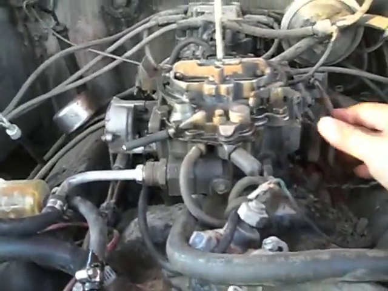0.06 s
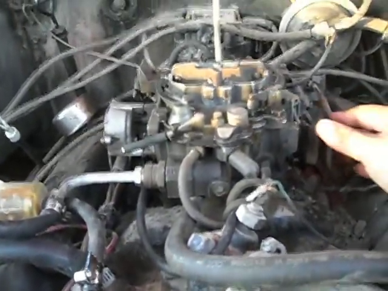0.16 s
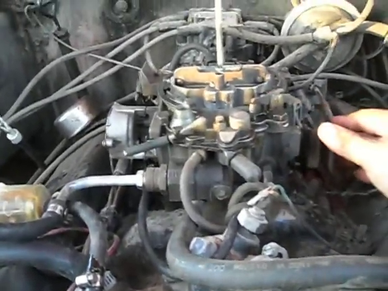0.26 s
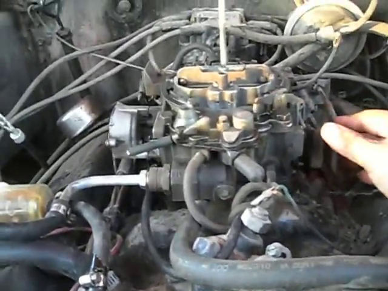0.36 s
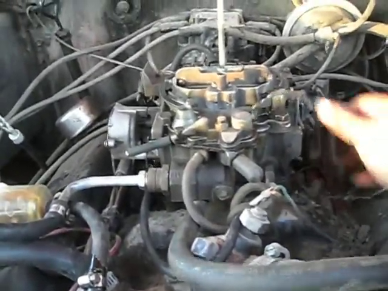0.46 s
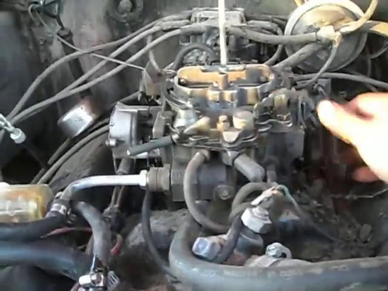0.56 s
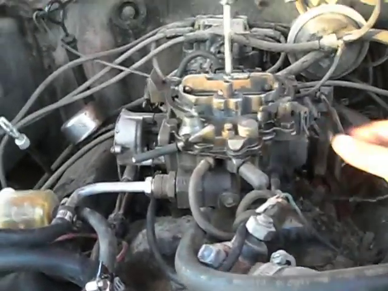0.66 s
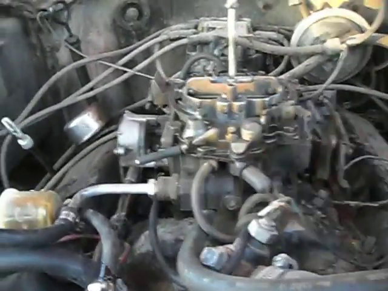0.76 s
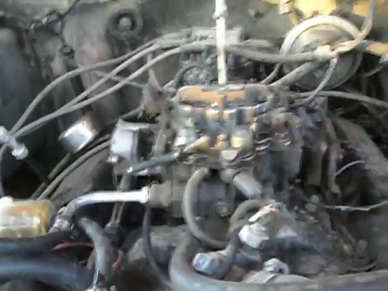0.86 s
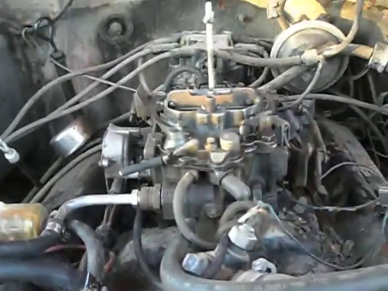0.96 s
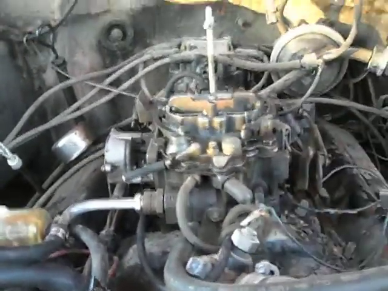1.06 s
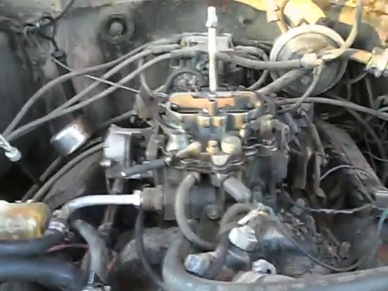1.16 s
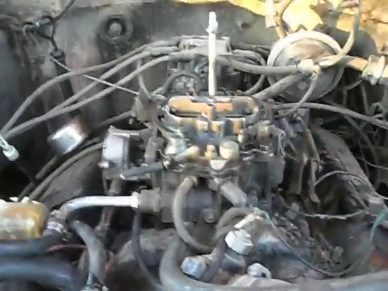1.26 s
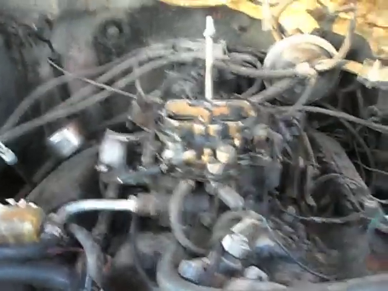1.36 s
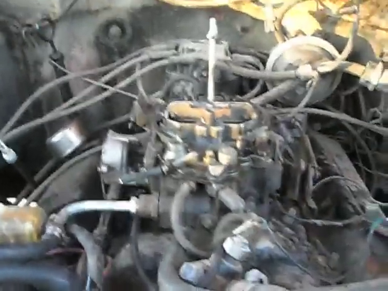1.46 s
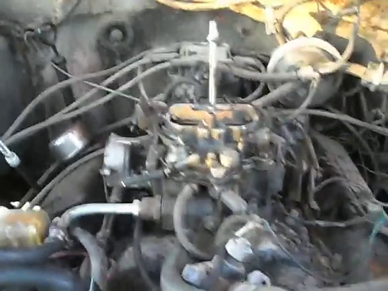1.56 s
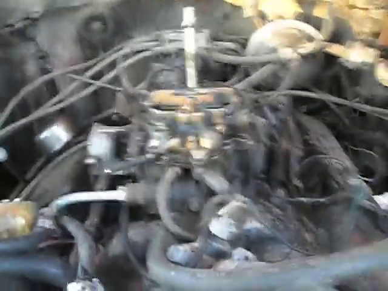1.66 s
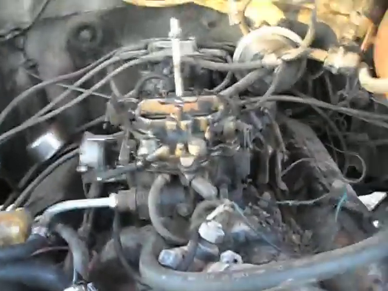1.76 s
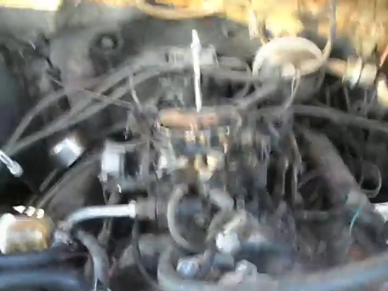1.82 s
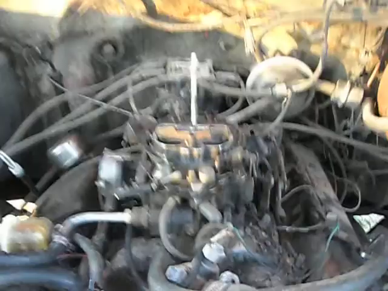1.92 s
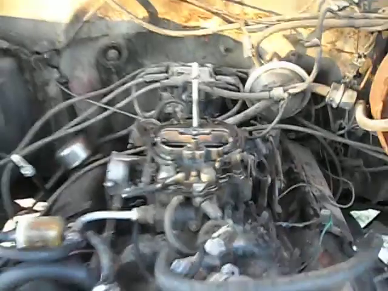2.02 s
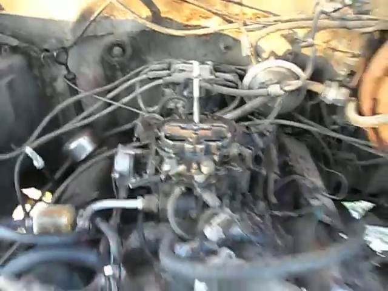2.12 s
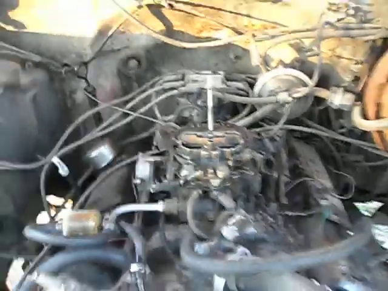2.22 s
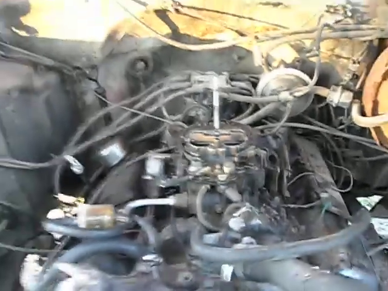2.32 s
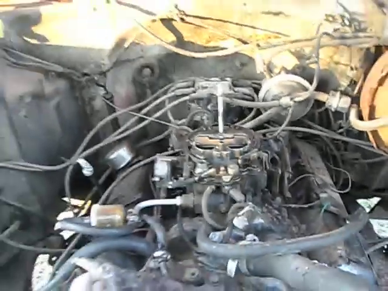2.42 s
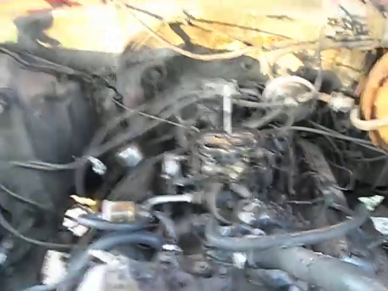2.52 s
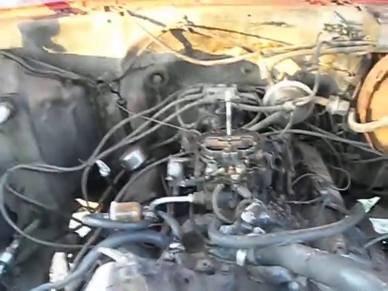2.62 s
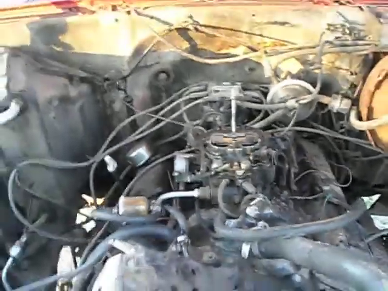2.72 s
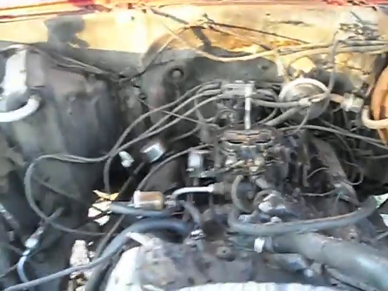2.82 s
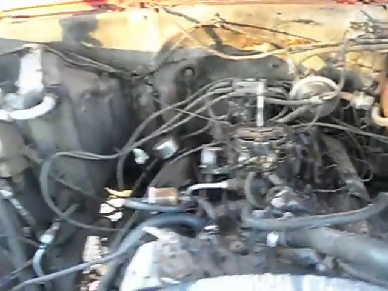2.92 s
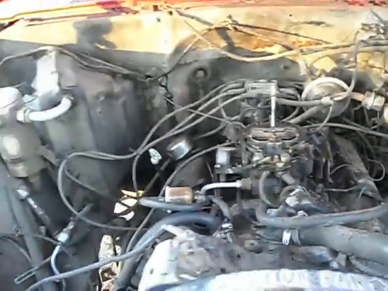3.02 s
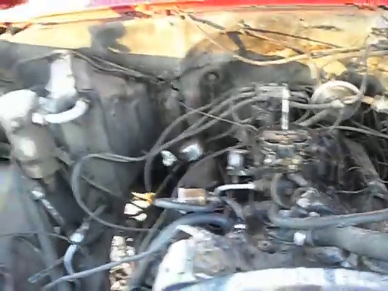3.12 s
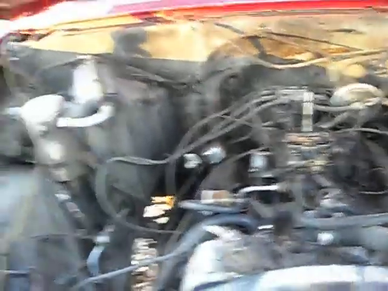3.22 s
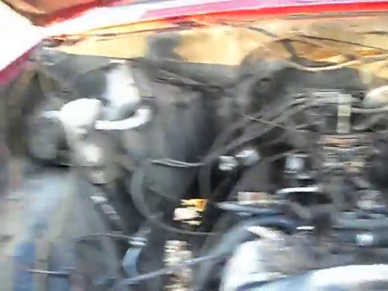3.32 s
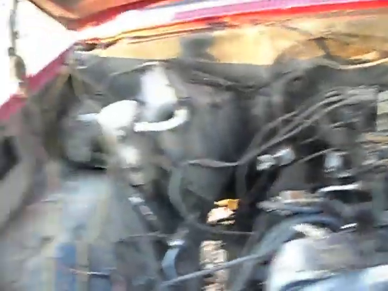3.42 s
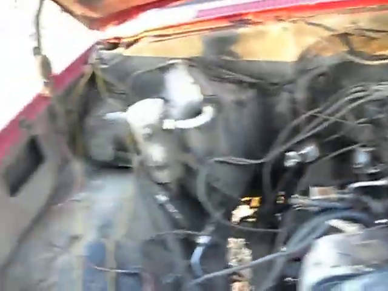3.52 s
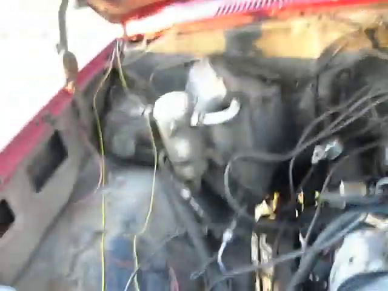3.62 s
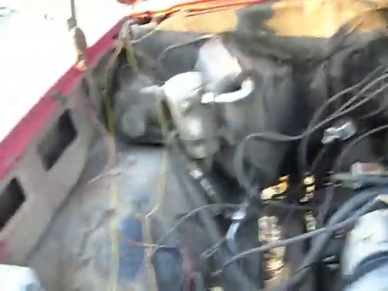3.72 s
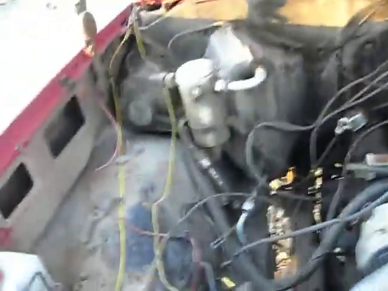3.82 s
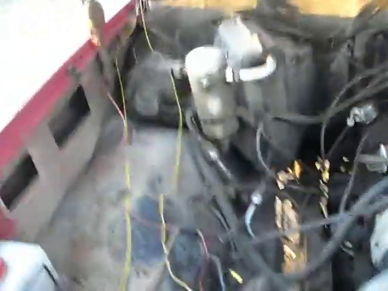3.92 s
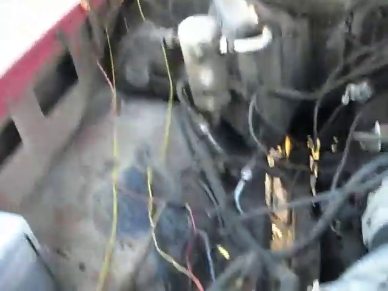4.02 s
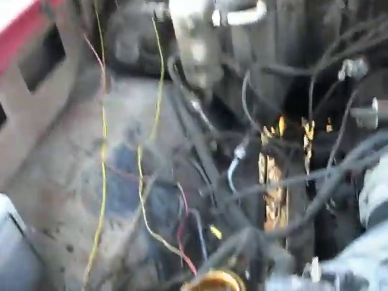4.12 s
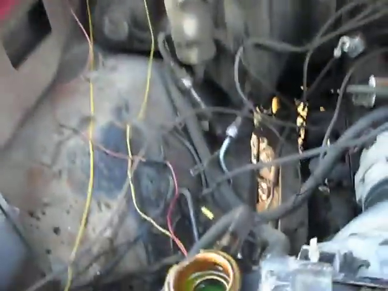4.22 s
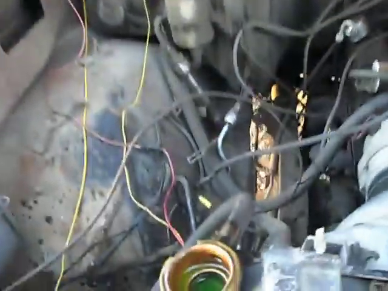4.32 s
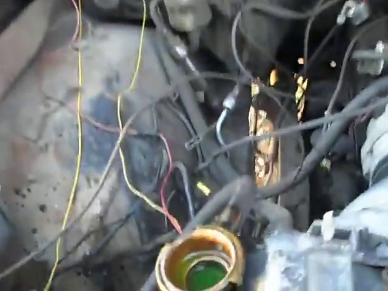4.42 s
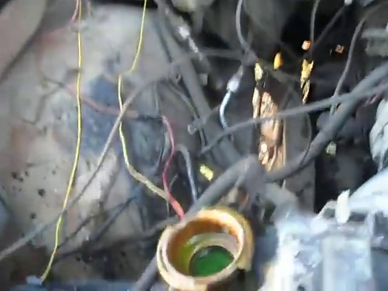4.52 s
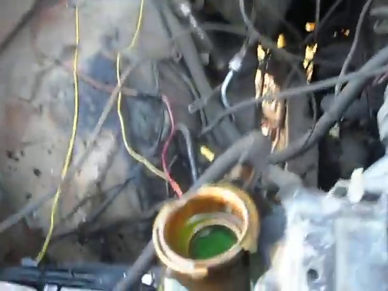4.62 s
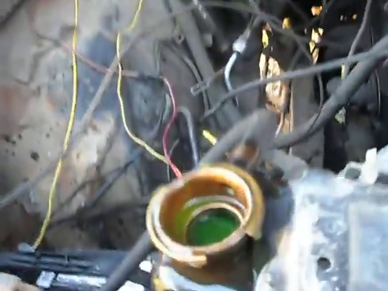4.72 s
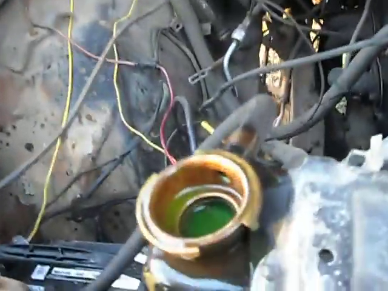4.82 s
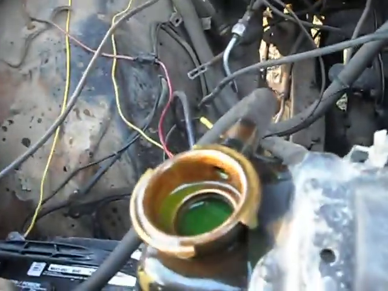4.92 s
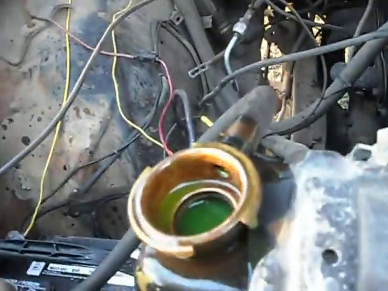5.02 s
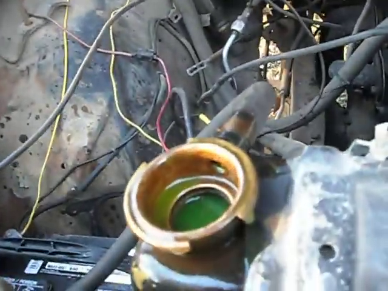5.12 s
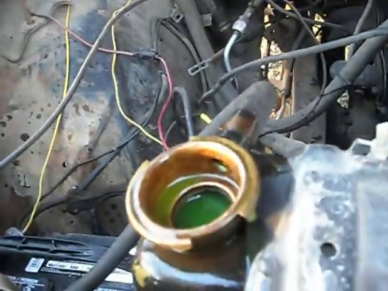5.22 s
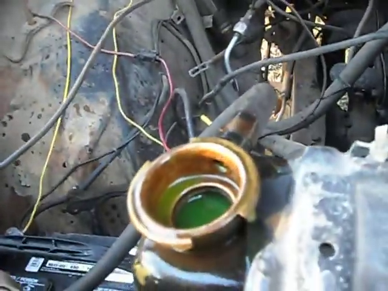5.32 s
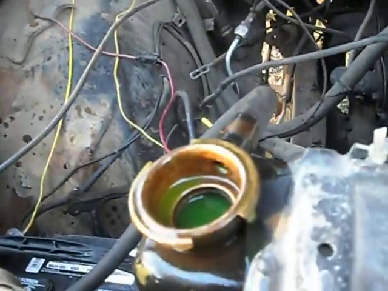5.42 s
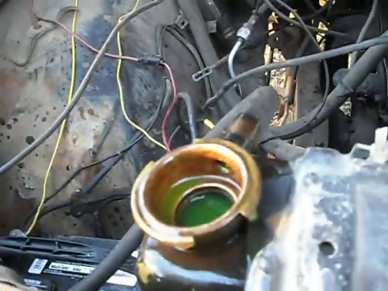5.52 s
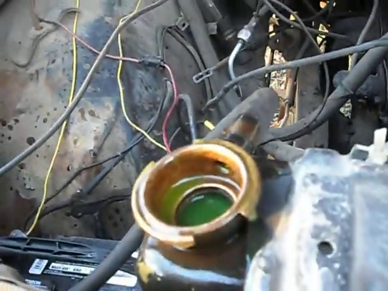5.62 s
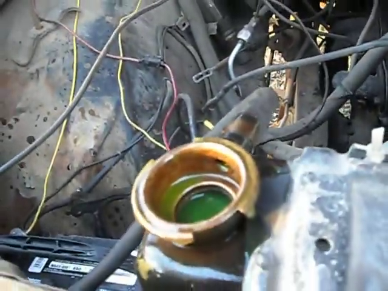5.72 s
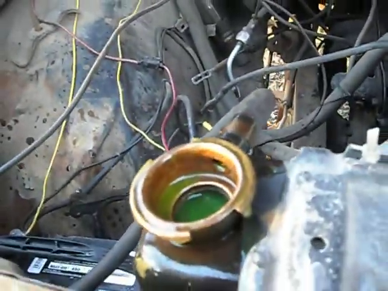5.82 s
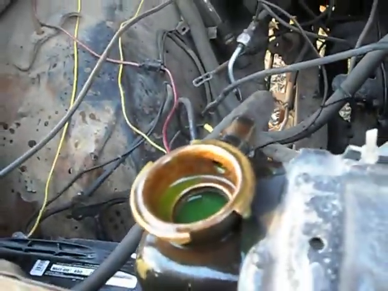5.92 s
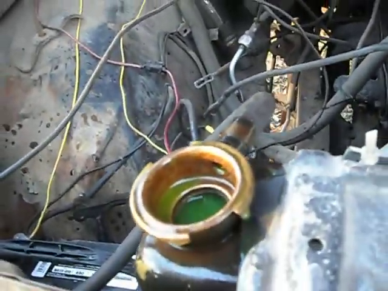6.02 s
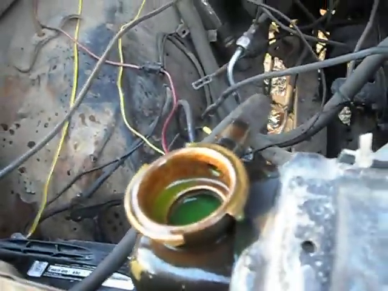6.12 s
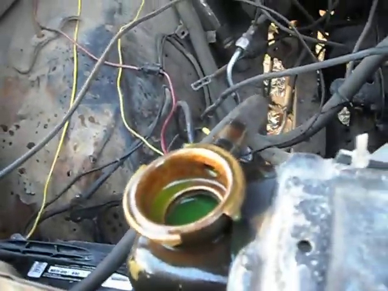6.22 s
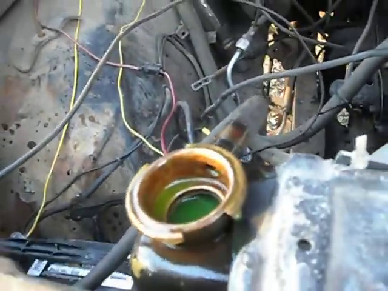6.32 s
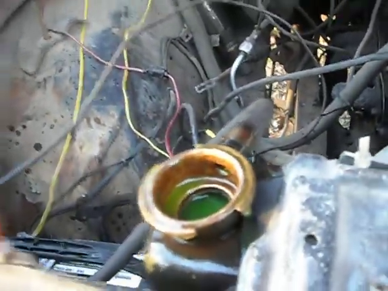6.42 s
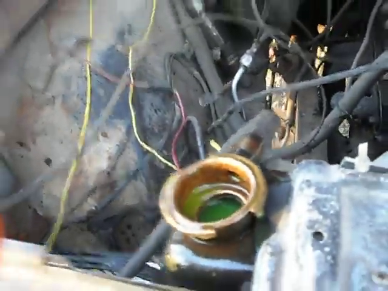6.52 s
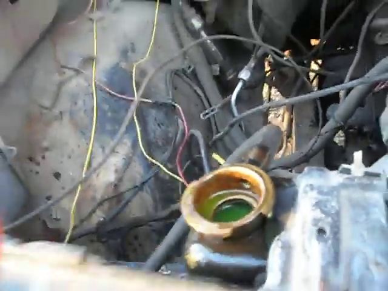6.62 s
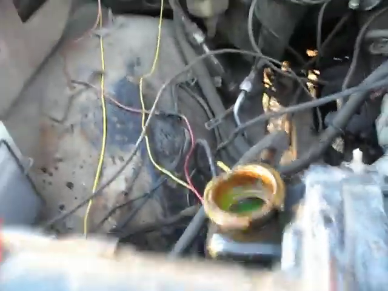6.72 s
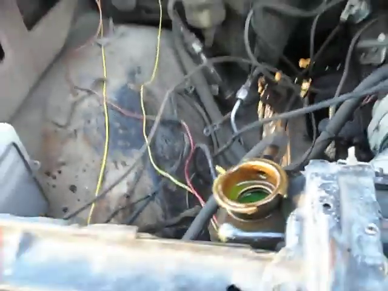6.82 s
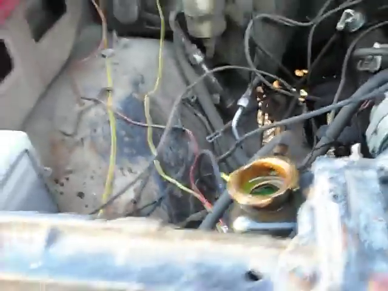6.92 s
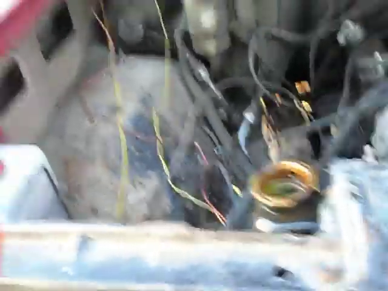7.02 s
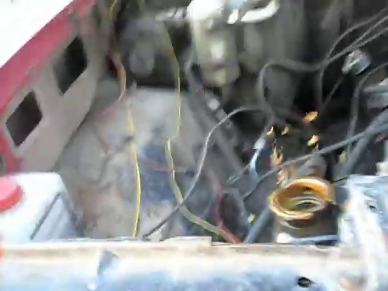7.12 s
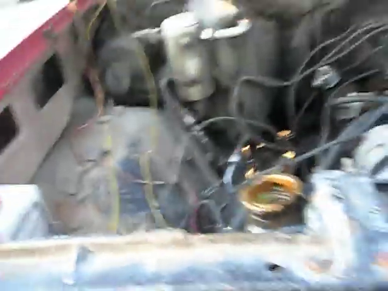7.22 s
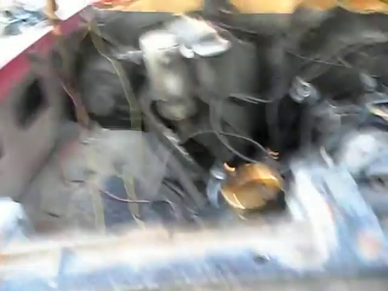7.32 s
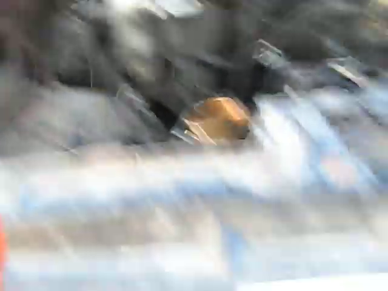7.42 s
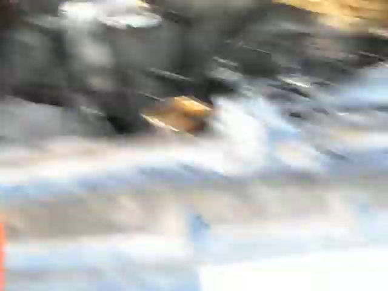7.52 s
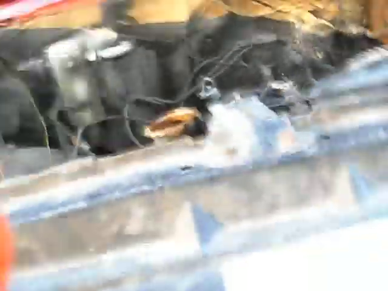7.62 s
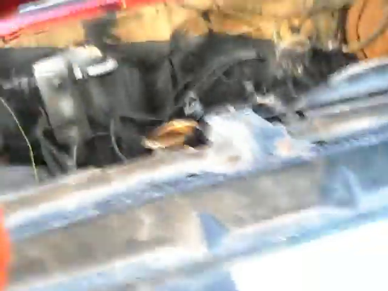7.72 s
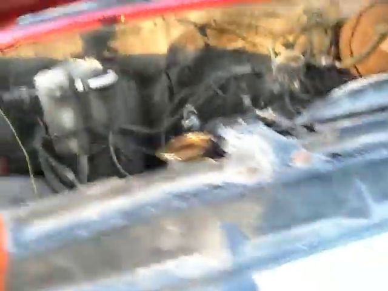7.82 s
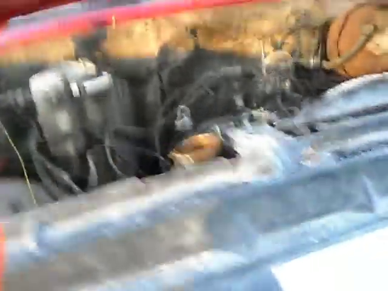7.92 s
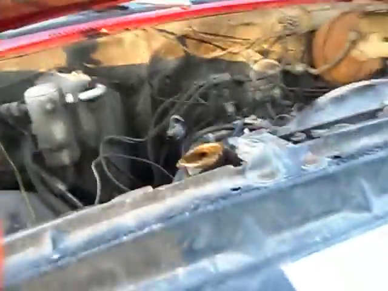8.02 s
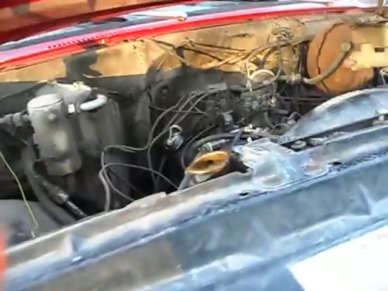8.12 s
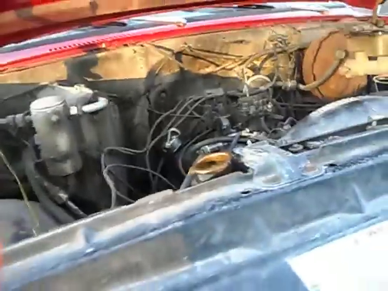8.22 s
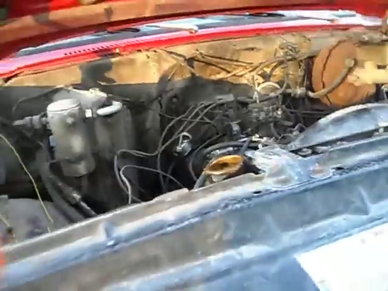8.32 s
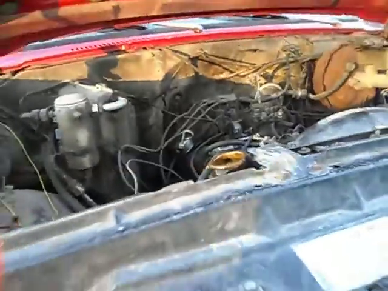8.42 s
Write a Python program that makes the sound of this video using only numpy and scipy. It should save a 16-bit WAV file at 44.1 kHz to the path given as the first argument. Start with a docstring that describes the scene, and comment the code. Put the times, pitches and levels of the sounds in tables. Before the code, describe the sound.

A large petrol V8 revs twice with a roaring carburettor gulp and buffeting fan wind, then settles into a lumpy, ticking, hissing idle.

```python
"""A gulp of air roars through an opened carburettor as a parked pickup's petrol V8 revs under its open hood.
A second blip follows, then it settles to a loping idle. Impulses at uneven firings ring pipe resonances for the
exhaust boom, and tones join at speed; shaped noise makes the intake, the ticking valve train and the hiss.
At first the microphone is close to the carburettor, where the cooling fan's draught buffets and overloads it."""
import sys
import numpy as np
from scipy import signal
from scipy.fft import rfft, irfft, next_fast_len
from scipy.io import wavfile
from scipy.ndimage import uniform_filter1d, map_coordinates

SR = 44100
rng = np.random.default_rng(int(sys.argv[2]) if len(sys.argv) > 2 else 0)


def bounce(signal):
    """Save signal as a 16-bit WAV file at the path given by the first command-line argument."""
    frames = np.transpose(np.atleast_2d(signal))
    limited = np.clip(frames, -1, 1)
    pcm = np.round(limited * 32767).astype(np.int16)
    wavfile.write(sys.argv[1], SR, pcm)


N = 373086
TIME = np.arange(N) / SR   # seconds


def from_db(db):
    """Decibels to gain."""
    return 10 ** (np.asarray(db) / 20)


def rms_one(x):
    """Scale to unit power."""
    return x / np.sqrt(np.mean(x ** 2) + 1e-20)


def in_time(rows):
    """Each column of a curve table at every sample."""
    seconds, *columns = np.transpose(rows)
    return [np.interp(TIME, seconds, column) for column in columns]


def coloured(x, spectrum):
    """Give a signal a spectrum with steep closed ends; unit power."""
    hz, db = np.transpose(spectrum)
    size = next_fast_len(N)
    # 1 Hz is added so that the octave scale can start at 0 Hz
    octave = np.log2(np.arange(size // 2 + 1) * SR / size + 1)
    outside = np.abs(octave - np.clip(octave, np.log2(hz[0]), np.log2(hz[-1])))
    gain = from_db(np.interp(octave, np.log2(hz), db) - 48 * outside)   # 48 dB per octave past the ends
    return rms_one(irfft(rfft(x, size) * gain, size)[:N])


def noise():
    """White noise."""
    return rng.standard_normal(N)


def drift(rate_hz):
    """Smooth chance: noise from 0 Hz up to about `rate_hz`; spread 1."""
    return coloured(noise(), [(1, 0), (rate_hz + 1, 0)])


def cut(x, hz, kind, order=2):
    """Butterworth low- or high-pass."""
    sections = signal.butter(order, min(hz, .45 * SR), kind, fs=SR, output="sos")
    return signal.sosfilt(sections, x + 1e-18)


def resonance(x, hz, width_hz):
    """Two-pole resonance with gain 1 on top."""
    r = np.exp(-np.pi * width_hz / SR)
    top = np.array([1, 0, -1]) * (1 - r * r) / 2
    return signal.lfilter(top, [1, -2 * r * np.cos(2 * np.pi * hz / SR), r * r], x + 1e-18)


def impulses(times, gains):
    """One impulse at each time."""
    inside = (times >= 0) & (times < TIME[-1])
    return np.bincount((times[inside] * SR).astype(int), gains[inside], N)


def decaying(x, seconds):
    """Each impulse becomes an exponential decay of the same height."""
    return signal.lfilter([1], [1, -np.exp(-1 / (seconds * SR))], x + 1e-18)


# The idle hunts a little. Each row: time in seconds, speed in rpm.
IDLE = [(2, 940.8), (4.4, 936.2), (4.65, 968.9), (5, 944.3), (6.4, 950.5), (6.8, 957.2), (7.15, 936.6),
        (7.7, 974.3), (8.4, 952.7)]
# Blips of the throttle. Each row: let go at seconds, speed hangs on for seconds, speed gained in rpm.
BLIPS = [(.07, .1, 680), (.64, 0, 987)]
RUN_UP_S, COAST_S = .2, .53   # the flywheel gathers and loses speed


def crankshaft():
    """Speed in rpm: each blip runs the engine up, then it coasts back to idle."""
    gained = []
    for let_go, hang, rpm in BLIPS:
        run_up = np.clip(1 + (TIME - let_go) / RUN_UP_S, 0, 1)
        coast = np.exp(-(np.maximum(TIME - let_go - hang, 0) / COAST_S) ** 2)
        gained.append(rpm * run_up * coast)
    return in_time(IDLE)[0] + np.max(gained, axis=0)


def revs(rpm):
    """Speed as a share: 0 at idle, 1 at the top of the strongest blip."""
    above = np.maximum(rpm - in_time(IDLE)[0], 0)
    return above / above.max()


OPENING_S, SHUTTING_S = 0.031, 0.055   # attack and release of the throttle plate


def throttle(held_s):
    """Opening 0-1: at each blip the plate swings open, is held and springs shut."""
    return sum(np.exp(-np.maximum(let_go - held_s - TIME, 0) / OPENING_S
                      - np.maximum(TIME - let_go, 0) / SHUTTING_S) for let_go, _, _ in BLIPS)


# Colours of the intake: low roar, rush of air, high jet. Each row: frequency in Hz, relative level in dB per Hz.
ROAR = [(130, -22), (220, -5.5), (317, 3), (472, -8), (633, -6.5), (680, -5), (809, -8.5), (886, -10.5),
        (2500, -20), (3250, -42), (5500, -120)]
RUSH = [(1200, -3), (2000, -9), (3000, -4.5), (4500, -5.5), (6000, -11.5)]
JET = [(6000, 2.5), (7100, 3.5), (10000, 0), (11000, -9)]
OPEN_S = 0.071   # the throttle stands wide open this long
CRACKED_S, CRACKED_SHARE = 0.13, 0.66   # cracked open this long before it is let go; share of the jet then
GULP_ROAR_DB, GULP_RUSH_DB, GULP_JET_DB = -10, -22.5, -29   # throttle wide open; the roar also needs top speed
SPIN_ROAR_DB, SPIN_RUSH_DB, SPIN_JET_DB = -16.5, -27, -41.5   # at top speed, throttle shut


def intake(cycles, rpm, pulsing=0.1, rough_db=2.0, roar_power=1.44, rush_power=2.84, jet_power=1.8):
    """Air hisses past the throttle edge in a high jet; wide open, pulsing intake strokes drag a rough roar through."""
    spin, wide = revs(rpm), throttle(OPEN_S)
    cracked = np.maximum(wide, CRACKED_SHARE * throttle(CRACKED_S))
    roughness = rms_one(from_db(rough_db * drift(84)))
    strokes = (1 + pulsing * np.cos(2 * np.pi * cycles * 8)) * roughness   # eight strokes a cycle
    roar = np.hypot(from_db(GULP_ROAR_DB) * wide * spin, from_db(SPIN_ROAR_DB) * spin ** roar_power)
    rush = np.hypot(from_db(GULP_RUSH_DB) * wide, from_db(SPIN_RUSH_DB) * spin ** rush_power)
    jet = np.hypot(from_db(GULP_JET_DB) * cracked, from_db(SPIN_JET_DB) * spin ** jet_power)
    low_air = roar * coloured(noise() * strokes, ROAR)
    rushing_air = rush * coloured(noise() * strokes, RUSH)
    return low_air + rushing_air + jet * coloured(noise(), JET)


FIRST_FIRING = .095   # share of a four-stroke cycle


def beats(cycles, count):
    """Times of `count` even events in each engine cycle, and their places in the cycle."""
    number = np.arange(int((cycles[-1] - FIRST_FIRING) * count))
    return np.interp(number / count + FIRST_FIRING, cycles, TIME), number % count


# Cylinders in firing order. Each row: pulse strength in dB, arrival late (+) or early (-) in ms,
# relative bark in the first manifold in dB, in the second in dB.
CYLINDERS = [(-1.5, 3.2, -12, -12), (1.7, 4.9, -14, -14), (-3.9, 1.5, 1, -8), (3.4, 1.5, -3, -10),
             (1.6, -7.0, -14, -14), (-1.1, 1.9, -14, 1), (-1.9, 3.9, -12, -2), (-.4, 2.9, -12, -14)]
# Exhaust pipe resonances. Each row: frequency in Hz, width in Hz, relative level in dB.
PIPE = [(66.34, 12.7, -2.5), (108.3, 13.9, -1)]
# Manifold resonances, each passed twice. Each row: frequency in Hz, width of one pass in Hz, relative level in dB.
MANIFOLD = [(162.2, 42, 6), (211, 41.7, 0.5)]
# Brief swells of the exhaust level at speed, thumps on the overrun. Each row: time in seconds, swell in dB.
SWELLS = [(0.199, 8), (.72, 9.5), (1.088, 7), (1.18, 8.5)]
SWELL_S = 0.016   # from the peak of a swell until its dB are down to 1/e
JITTER_MS, UNEVEN_DB, BARK_SPREAD_DB = .3, 1.1, 2.8   # chance from firing to firing
BOOM_IDLE_DB, BOOM_REV_DB = -19.5, -11.5   # exhaust at idle; at speed, before its mix of boom and tone
MERGE_START_RPM, MERGE_END_RPM = 1160, 1360   # the pulses merge into a tone over this range


def exhaust(cycles, rpm, muffler_hz=200, bark_db=-34, rounding=3.2, lope_db=0.9):
    """Each firing sends a pulse down the pipes; the uneven pattern of the cylinders makes the lope."""
    times, cylinder = beats(cycles, count=8)
    strength_db, late_ms, *barks_db = np.array(CYLINDERS)[cylinder].T
    chance = rng.standard_normal((len(times), 3))
    arrival = times + (late_ms + JITTER_MS * chance[:, 0]) / 1000
    pulses = impulses(arrival, from_db(strength_db + UNEVEN_DB * chance[:, 1]))
    # neighbouring resonances ring in opposite polarity
    boom = sum((-1) ** k * from_db(db) * resonance(pulses, hz, width) for k, (hz, width, db) in enumerate(PIPE))
    boom = cut(cut(boom, 39.4, "high", order=4), muffler_hz, "low")
    # loudness is evened over about two idle cycles, so the lope inside a cycle stays
    boom /= np.sqrt(uniform_filter1d(boom ** 2, size=SR // 4) + 1e-18)
    # pressure builds where the strong cylinders bunch
    boom *= from_db(lope_db * np.cos(2 * np.pi * (cycles - .7)))
    boom = rounding * np.tanh(boom / rounding)   # the muffler rounds off the strongest puffs
    # a few cylinders bark in each manifold, once in every cycle
    sharp = [impulses(arrival, from_db(db + BARK_SPREAD_DB * chance[:, 2])) for db in barks_db]
    bark = rms_one(sum(from_db(db) * resonance(resonance(x, hz, width), hz, width)
                       for x, (hz, width, db) in zip(sharp, MANIFOLD)))
    # at speed a rough tone sounds at the firing rate, with the bank imbalance below it
    tone = sum(gain * np.sin(2 * np.pi * cycles * order) * from_db(3 * drift(16))
               for order, gain in [(8, 1), (6, .7)])
    merged = np.clip((rpm - MERGE_START_RPM) / (MERGE_END_RPM - MERGE_START_RPM), 0, 1)
    swells_db = sum(db * np.exp(-((TIME - s) / SWELL_S) ** 2) for s, db in SWELLS)
    at_speed = from_db(BOOM_REV_DB + swells_db) * (0.46 * boom + 0.68 * tone)
    at_idle = from_db(BOOM_IDLE_DB) * boom
    return merged * at_speed + (1 - merged) * at_idle + from_db(bark_db) * bark


# Colours of the draught: deep rumble and brighter flutter. Each row: frequency in Hz, relative level in dB per Hz.
RUMBLE = [(10, -2.5), (20, -17), (40, -4.5), (60, -10), (120, -10), (250, -21)]
FLUTTER = [(88, -67), (150, 10), (233, -2.5), (308, 8), (471, -1), (641, -2), (1590, -13), (2860, -21),
           (5000, -42), (6500, -102), (11000, -120)]
# The strongest buffets. Each row: time in seconds, height in dB before the common trim and the softening of the attack.
BUFFETS = [(0.266, 2), (0.304, -11), (0.44, -7.5), (0.473, -12), (0.773, -3), (0.809, -6), (0.848, -13),
           (1.005, -9), (1.087, -8), (1.142, -8), (1.234, -15.5), (1.366, -13), (1.421, -15.5),
           (1.482, -14.5), (1.557, -19), (1.757, -19), (1.787, -21), (1.876, -25)]
RUMBLE_DB, RUMBLE_REV_DB = -27.5, -10   # draught on the microphone: constant part, and part added at top speed
FLUTTER_DB, FLUTTER_REV_DB = -36.5, -16.5   # flutter of the eddies, likewise
IDLE_RUMBLE_DB = -36   # faint air rumble that remains away from the fan
LEAVES_DRAUGHT_S, DRAUGHT_FADE_S = 1.84, 0.11   # the microphone is drawn out of the draught
SMALL_BUFFETS_PER_S, SMALL_BUFFET_DB = 8.7, -29   # weaker ones come at random; height before softening


def draught(rpm, lumpy_db=5.5, buffet_db=-3, buffet_s=0.0092, swell_hz=300, flutter_power=1.9):
    """Fan eddies rumble and flutter on the microphone, more so at speed, and tear into short, brighter buffets."""
    spin = revs(rpm)
    exposed = np.exp(-np.maximum(TIME - LEAVES_DRAUGHT_S, 0) / DRAUGHT_FADE_S)
    rumble = exposed * np.hypot(from_db(RUMBLE_DB), from_db(RUMBLE_REV_DB) * spin) + from_db(IDLE_RUMBLE_DB)
    eddies = rms_one(from_db(lumpy_db * drift(83)))
    flutter = exposed * eddies * np.hypot(from_db(FLUTTER_DB), from_db(FLUTTER_REV_DB) * spin ** flutter_power)
    times, peak_db = np.transpose(BUFFETS)
    strong = impulses(times, from_db(peak_db + buffet_db))
    small = exposed * from_db(SMALL_BUFFET_DB) * (rng.random(N) < SMALL_BUFFETS_PER_S / SR)
    buffets = cut(decaying(strong + small, buffet_s), swell_hz, "low", order=1)   # softens the attack
    return rumble * coloured(noise(), RUMBLE) + np.hypot(flutter, buffets) * coloured(noise(), FLUTTER)


def valve_train(cycles, valve_spread_db=2.5, uneven_db=2.0, knock_s=0.0028, wash=0.98):
    """Loudness curve of sixteen valves shutting in each cycle: short knocks over a steady wash of chain and belt."""
    times, valve = beats(cycles, count=16)
    lash_db = valve_spread_db * rng.uniform(-1, 1, 16)
    chance = rng.uniform(-1, 1, (len(times), 2))
    # each tap strays by up to 1 ms
    taps = impulses(times + .001 * chance[:, 0], from_db(lash_db[valve] + uneven_db * chance[:, 1]))
    return rms_one(decaying(taps, knock_s) + wash)


def hood_echo(x, share=0.27, path_ms=2.6, sway_ms=0.22):
    """The raised hood throws the sound back; the path changes as the microphone is carried about."""
    late = (path_ms + sway_ms * drift(.3)) * SR / 1000   # samples
    echo = map_coordinates(x, [np.arange(N) - late], order=3)
    return (x + share * echo) / np.hypot(1, share)


# Colours of the bay: block drone, valve clatter, carburettor hiss and its top.
# Each row: frequency in Hz, relative level in dB per Hz.
DRONE = [(275, 2.5), (300, -3.5), (345, 2.5), (400, -6), (440, -7.5)]
CLATTER = [(250, -52.5), (430, -1.5), (612, -2), (653, -0.5), (710, -6.5), (845, -6), (1010, -11),
           (1430, -15), (1680, -20), (2000, -17), (2600, -25.5), (4400, -120)]
HISS = [(940, -42), (1600, -9), (1690, -14), (2030, -8.5), (2260, -1), (2580, -5), (3020, -6.5),
        (3960, -3.5), (4640, -9.5), (5230, -13), (5600, -10.5), (7280, -28), (12300, -120)]
SIZZLE = [(3060, -33), (5200, -10.5), (6120, 2), (7820, -2), (9640, -3), (10100, -8), (11000, -15),
          (14300, -53), (22000, -120)]
# Level of the block's low drone. Each row: time in seconds, level in dB before the hood echo.
DRONE_LEVEL = [(2.1, -40), (2.7, -49), (3.6, -39.5), (4.2, -45.5), (5.6, -39.5), (7.15, -48), (7.45, -38.5),
               (8.4, -47)]
# Ringing of covers and brackets. Each row: frequency in Hz, relative level in dB.
COVERS = [(1535, -1), (1731, -3), (1895, -2), (2042, -2), (2300, 2), (2358, 2), (3140, -3), (4377, -3),
          (4576, -3), (4852, -3), (5249, -5)]
# A narrow band of the hiss glides as the microphone is carried about. Each row: time in seconds, centre in Hz.
GLIDING_BAND = [(1.5, 3900), (2.1, 3480), (2.55, 3950), (3.2, 3800)]
GLIDING_BAND_WANDER_HZ = 88.9
CLATTER_DB, HISS_DB, SIZZLE_DB = -38.5, -41, -46.5   # close up, before mixing and hood echo
# the microphone backs away and the treble goes first
CLATTER_FADE_DB_PER_S, HISS_FADE_DB_PER_S, SIZZLE_FADE_DB_PER_S = 0.25, 0.56, 0.73
HUNT_DB_PER_RPM = 0.0375   # clatter grows louder as the idle picks up; the hiss half as much


def engine_bay(cycles, hiss_pulse=0.16, sizzle_pulse=0.36, band_width_hz=150, ring_width_hz=14):
    """Knocking noise drives the clatter, drone and ringing covers, with the carburettor's hiss pulsing along."""
    idle_rpm, = in_time(IDLE)
    hunt_db = HUNT_DB_PER_RPM * (idle_rpm - idle_rpm.mean())
    clatter_db = CLATTER_DB - CLATTER_FADE_DB_PER_S * TIME + hunt_db
    hiss_db = HISS_DB - HISS_FADE_DB_PER_S * TIME + .5 * hunt_db
    sizzle_db = SIZZLE_DB - SIZZLE_FADE_DB_PER_S * TIME
    knocks = valve_train(cycles)
    drone = from_db(in_time(DRONE_LEVEL)[0]) * coloured(knocks * noise(), DRONE)
    clatter = from_db(clatter_db + 0.96 * drift(8.5)) * coloured(knocks * noise(), CLATTER)
    taps = knocks * noise()
    covers = rms_one(sum(from_db(db) * resonance(taps, hz, ring_width_hz) for hz, db in COVERS))
    hiss = coloured(noise() * (1 + hiss_pulse * (knocks - 1)), HISS)
    sizzle = coloured(noise() * (1 + sizzle_pulse * (knocks - 1)), SIZZLE)
    band_hz = in_time(GLIDING_BAND)[0] + GLIDING_BAND_WANDER_HZ * drift(2)
    gliding_band = rms_one(drift(band_width_hz) * np.sin(2 * np.pi * np.cumsum(band_hz) / SR))
    middle = .88 * hiss + .4 * covers + .36 * gliding_band
    # middle and sizzle swell once a crankshaft turn and wander a little
    swell = from_db(0.52 * np.sin(2 * np.pi * 2 * cycles) + 0.98 * drift(6.2))
    upper = swell * (from_db(hiss_db) * middle + from_db(sizzle_db) * sizzle)
    return hood_echo(drone + clatter + upper)


def air_bleed(hz=9750, width_hz=160, level_db=-57):
    """A tiny air passage sings thinly; it fades as the microphone leaves the carburettor."""
    nearness = np.interp(TIME, [3.0, 5.0], [1, .3])
    singing = rms_one(drift(width_hz) * np.sin(2 * np.pi * hz * TIME))
    return from_db(level_db) * nearness * singing


# Sharp clicks of the throttle linkage. Each row: time in seconds, strength in dB before noise and filtering.
CLICKS = [(.274, -15.5), (0.44, -16.5), (1.091, -16.5)]
# Ringing modes of the lever. Each row: frequency in Hz, relative level in dB, 60 dB decay time in seconds.
LINKAGE = [(1250, 0, .015), (2550, 0, .02), (3900, -6, .012)]


def linkage():
    """The throttle lever snaps against its stop: a short crack that faintly rings the lever."""
    times, strength_db = np.transpose(CLICKS)
    crack = decaying(impulses(times, from_db(strength_db)), .005) * noise()
    ringing = sum(from_db(db) * resonance(crack, hz, np.log(1000) / (np.pi * t60)) for hz, db, t60 in LINKAGE)
    return .7 * cut(cut(crack, 700, "high"), 5000, "low") + 1.5 * ringing


def scene():
    """The engine's sounds turn with the crankshaft; a four-stroke cycle takes two turns."""
    rpm = crankshaft()
    cycles = np.cumsum(rpm) / (120 * SR)
    engine = intake(cycles, rpm) + exhaust(cycles, rpm) + engine_bay(cycles)
    return (engine + draught(rpm) + air_bleed() + linkage())[None]


MICROPHONE_TOP_HZ, CUTOFF_HZ = 10600, 15700   # low-pass before and after the overload
OVERLOAD = .72   # clipping level, full scale = 1


def record(dry):
    """The microphone loses the top octave and overloads on the loudest peaks."""
    clipped = np.clip(cut(dry, MICROPHONE_TOP_HZ, "low", order=12), -OVERLOAD, OVERLOAD)
    return cut(clipped, CUTOFF_HZ, "low", order=16)


dry = scene()
out = record(dry)
bounce(out)
```